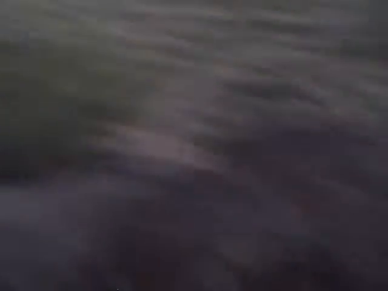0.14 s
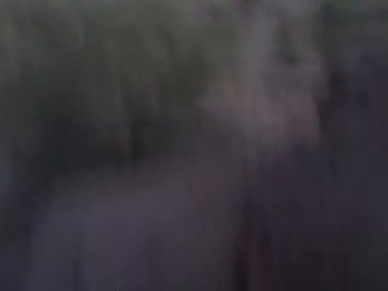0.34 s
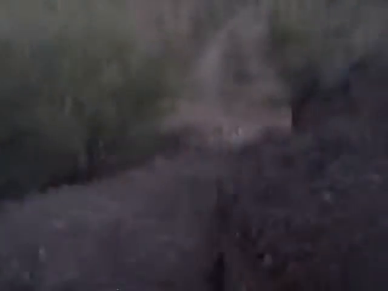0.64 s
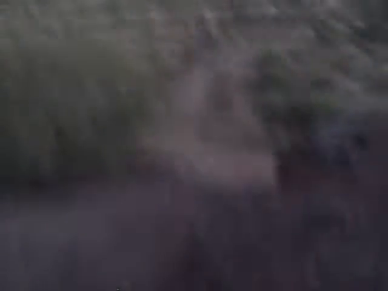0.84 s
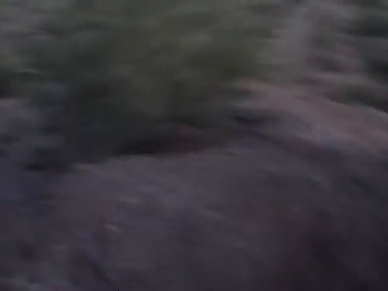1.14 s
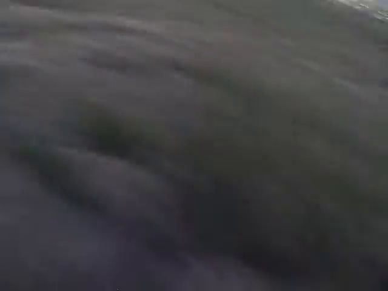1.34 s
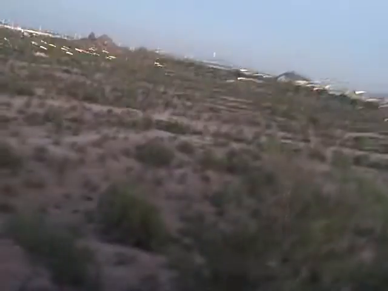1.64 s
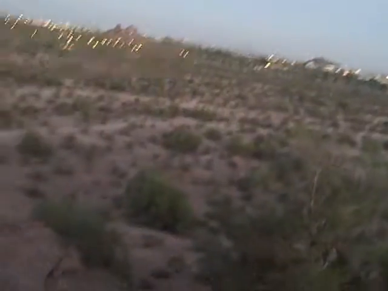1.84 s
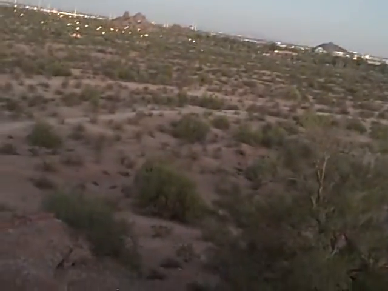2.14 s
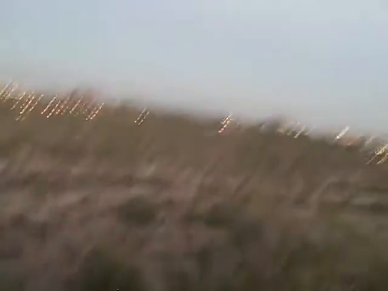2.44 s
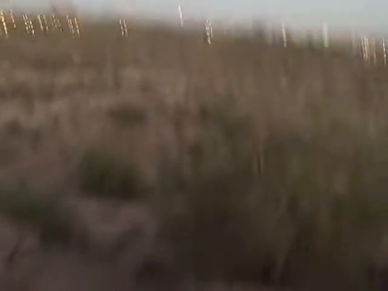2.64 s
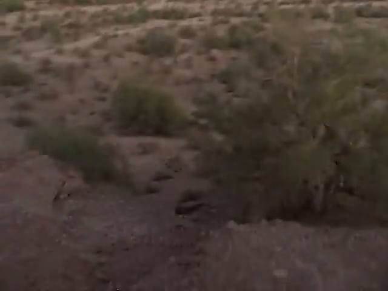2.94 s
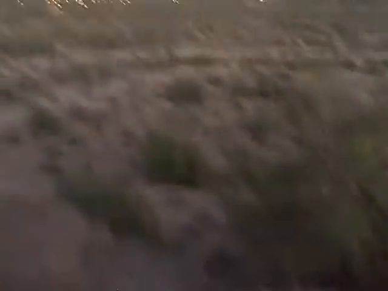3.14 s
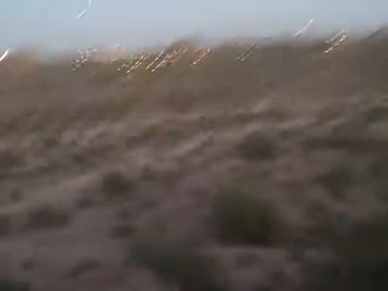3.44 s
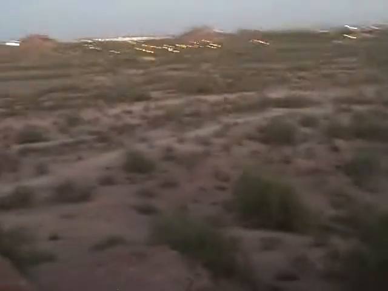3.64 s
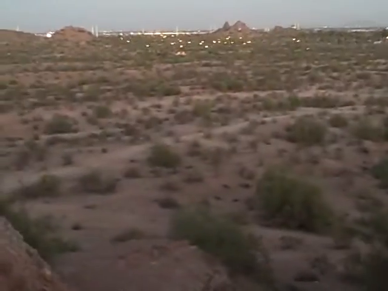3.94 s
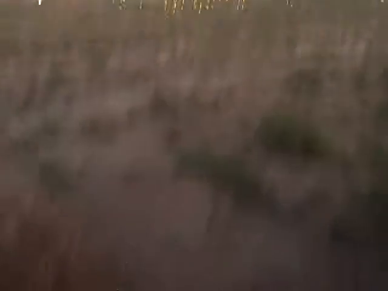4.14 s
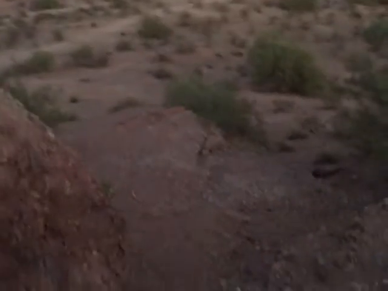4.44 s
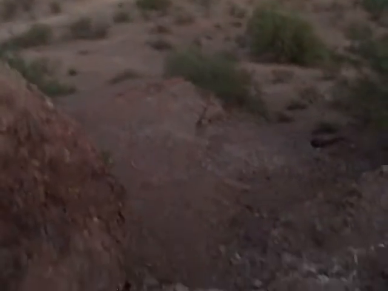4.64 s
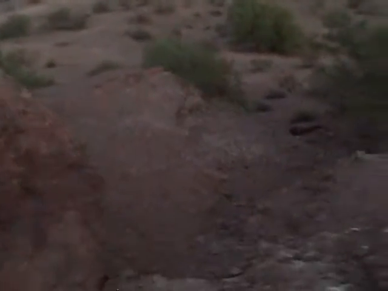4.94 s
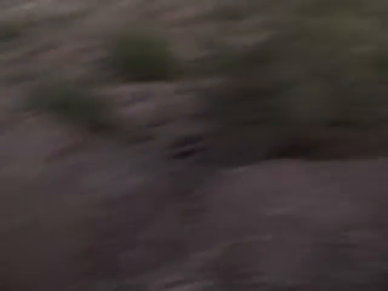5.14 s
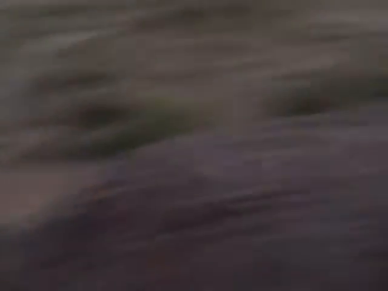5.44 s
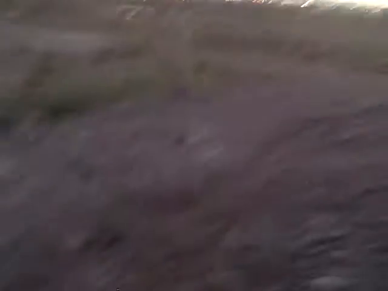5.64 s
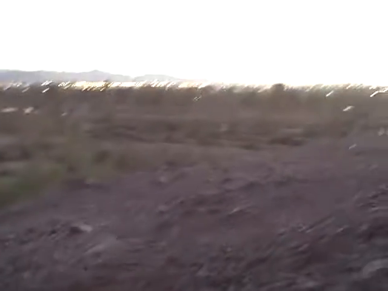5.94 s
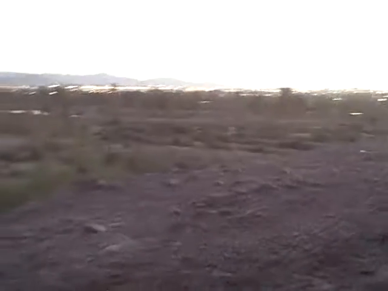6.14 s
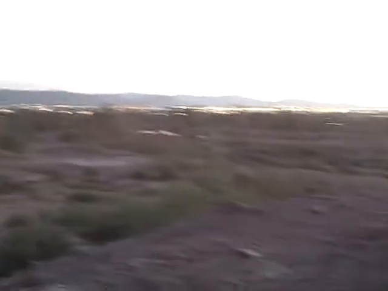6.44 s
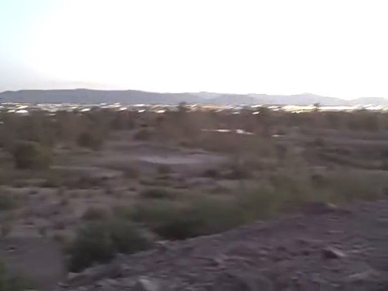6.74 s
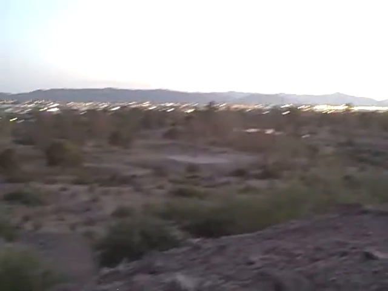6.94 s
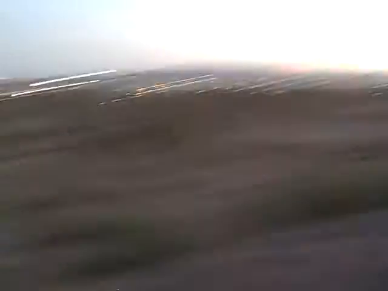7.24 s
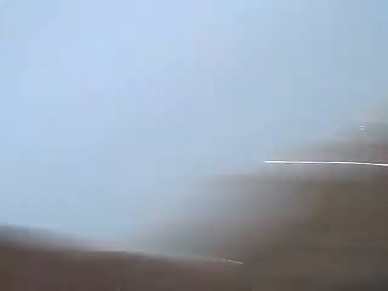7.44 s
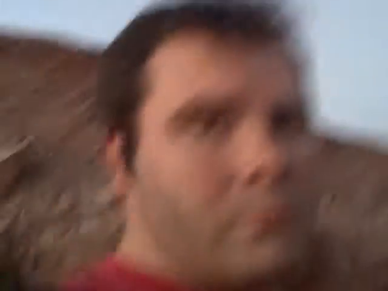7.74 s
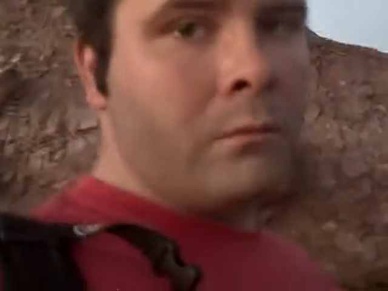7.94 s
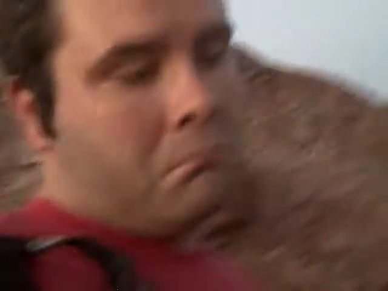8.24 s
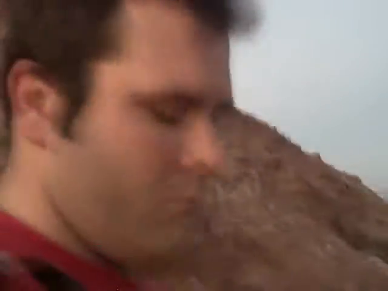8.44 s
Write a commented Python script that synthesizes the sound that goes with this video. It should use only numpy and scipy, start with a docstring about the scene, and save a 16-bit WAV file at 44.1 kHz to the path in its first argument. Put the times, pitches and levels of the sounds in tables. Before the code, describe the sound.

A cicada keeps up a high, finely pulsing buzz in open desert scrub, wavering in level and brightness as a hand-held microphone moves. Boots crunch on gravel at the start, and loose pebbles knock now and then. Near the end come a few more soft steps, the buzz drops in level, and a strap gives a tiny creak. A faint, low hum of distant traffic lies underneath.

```python
"""Cicada in desert scrub

A cicada buzzes by buckling its tymbal, a ribbed drum of skin, about 142 times a second. Each sharp
click echoes off the ground, the bushes and a walker, and the echoes shift as a hand-held camera moves.
A dull hiss pulses in time with the clicks, and a far city hums under a light breeze.
Boots crunch on gravel, pebbles knock, and at last a strap creaks."""
import sys
import numpy as np
from scipy import signal
from scipy.fft import rfft, irfft, next_fast_len
from scipy.io import wavfile
from scipy.ndimage import uniform_filter1d

SR = 44100
rng = np.random.default_rng(int(sys.argv[2]) if len(sys.argv) > 2 else 0)


def transcribe(signal):
    """Save signal, clipped to [-1, 1], as a 16-bit WAV file at the path in sys.argv[1]."""
    frames = np.atleast_2d(signal).T
    limited = np.clip(frames, -1, 1)
    pcm = np.round(limited * 32767).astype(np.int16)
    wavfile.write(sys.argv[1], SR, pcm)


N = 378676

# how loud and bright the cicada is: (time [s], level [dB], treble tilt [dB per octave])
SONG = [(0.0, -28.5, 9), (0.45, -30, 4.5), (1.32, -27.5, 3), (1.55, -29, 4.5), (3.01, -28.5, 2.5),
        (3.39, -31.5, 0), (4.68, -29.5, 1), (5.02, -31, -3), (5.33, -28.5, 1.5), (6.12, -33.5, 2.5),
        (7.44, -30, 5.5), (7.65, -39.5, 1), (8.13, -37, 1.5), (8.35, -38, -0.5), (8.59, -36, 4)]
# the sound's trip gets shorter as the walker comes near: (time [s], travel time [ms])
TRAVEL_TIME = [(0.0, 7), (0.3, 7.3), (0.9, 4.24), (1.7, 2.4), (2.4, 2.3), (3.9, 2.92), (4.8, 2.94),
               (5.4, 2.34), (6.0, 3.7), (6.3, 2.86), (7.2, 2.98), (7.9, 2.74), (8.6, 3.26)]
# the tone of the tymbal: (frequency [Hz], level [dB])
TYMBAL_TONE = [(5200, -51), (6000, -33), (6330, -9.5), (7000, -11.5), (8080, -8), (9240, -2.5), (9760, 2),
               (10400, -2.5), (11300, -5), (12200, -3), (13000, -7), (14300, -15.5), (15000, -17.5),
               (16000, -17)]
# weaker clicks as the tymbal springs back: (delay [ms], level [dB])
SPRING_BACK = [(1.42, -1), (2.118, -3)]
# the ground echo moves as the camera is raised and lowered: (time [s], delay [ms], level [dB])
GROUND_ECHO = [(0, 2.9, -20.), (1.3, 3.3, -16.), (1.9, 3.0, -10.), (2.75, 3.0, -10.), (3.4, 3.6, -13.),
               (3.85, 2.95, -12.), (4.5, 2.83, -9.), (5.05, 2.78, -10.), (5.35, 3.2, -17.),
               (5.8, 3.35, -18.), (7.4, 3.4, -15.), (8.6, 3.25, -18.)]
# how much the echoes outweigh the direct click at each pitch: (frequency [Hz], level [dB])
SCRUB_TONE = [(6000, 9), (8000, 2), (9000, -1.5), (9800, -1), (10700, -1), (12200, 5.5), (15500, 11.5)]
# echo off the walker's body, strongest once the camera faces it: (time [s], delay [ms], level [dB])
BODY_ECHO = [(0, .74, -12), (.6, .75, -13), (1.4, .84, -13), (3.0, .84, -12), (3.4, 1., -20),
             (5.2, .85, -19), (6.0, .92, -14), (7.5, 1.03, -18), (7.8, 1.03, -12), (8.1, .98, -5),
             (8.6, 1.02, -9)]
# a dull hiss that pulses in time with the clicks: (frequency [Hz], level [dB])
HISS_TONE = [(300, -2.5), (700, -1), (1500, -2), (3000, -1.5), (5000, -1.5), (6500, -1), (9000, -45)]
# the far traffic: (frequency [Hz], level [dB])
HUM_TONE = [(8.8, -29), (15, 1), (60, 2), (179, -4), (353, -13), (871, -22), (5030, -30), (6000, -22),
            (7800, -13), (13200, -120)]
# gravel giving way under a boot: (time [s], level [dB], length [s], main frequency [Hz])
CRUNCHES = [(0.083, -38.5, 0.055, 600.), (0.126, -32, 0.043, 1200.), (0.171, -37.5, 0.046, 1350.),
            (0.21, -35, 0.031, 900.), (.30, -48, 0.048, 1000.), (.455, -49, 0.037, 1200.),
            (0.533, -45, 0.032, 500.), (0.562, -40.5, 0.042, 910), (0.601, -47.5, 0.042, 800.),
            (0.634, -42.5, 0.044, 2300.), (1.088, -47.5, 0.091, 700.), (7.4, -52.5, 0.12, 800.),
            (7.678, -53.5, 0.041, 795), (8.419, -50, 0.045, 1200.)]
# pebbles knocking, except the last row, which is the first tick of the strap's creak:
# (time [s], peak level [dB], pitch [Hz], ring time [s])
KNOCKS = [(.357, -27.5, 1250, 0.0074), (.412, -37, 840, 0.016), (.573, -31, 900, .014),
          (0.862, -28, 1010, .02), (0.869, -32, 1140, 0.025), (.973, -39., 960, .014),
          (1.054, -18.5, 1010, 0.012), (1.373, -29, 430, .012), (1.466, -31, 660, .014),
          (3.172, -35, 750, .01), (3.534, -29, 775, .011), (5.332, -24.5, 970, 0.017),
          (5.339, -28.5, 1200, 0.0087), (7.428, -32, 600, 0.013), (7.469, -33, 980, .012),
          (7.493, -24.5, 1050, 0.016), (7.566, -35., 600, 0.014), (7.798, -41, 2000, .006),
          (8.434, -36, 500, .012), (8.445, -39, 800, .012), (8.511, -40, 1300, .012)]
# a knock's notes: (frequency [times the pitch], level [dB], length [share of the ring time])
KNOCK_NOTES = [(.55, -13, 0.51), (1., 2.5, 0.74), (1.3, -2, 0.63), (1.9, 1, 0.37), (2.6, -11, 0.38)]
# the strap's notes: (frequency [Hz], level [dB], ring time [s])
STRAP_NOTES = [(815, -2.5, 0.02), (1370, -2, .01), (1530, 0, 0.016), (1856, 0, .009), (2420, -2, .009),
               (3150, -4.5, .008)]


def gain_of(db):
    """Turns decibels into a number to multiply by."""
    return 10 ** (np.asarray(db) / 20)


def evened(x):
    """Scales a sound to an average (rms) level of 1."""
    return x / np.sqrt(np.mean(x ** 2) + 1e-20)


def tone_db(tone, hz):
    """Looks up a tone table's level at the frequencies hz."""
    freqs, db = np.transpose(tone)
    return np.interp(np.log(hz + 1), np.log(freqs + 1), db)


def coloured(x, tone):
    """Filters a sound by a tone table."""
    size = next_fast_len(len(x))
    gains = gain_of(tone_db(tone, np.fft.rfftfreq(size, 1 / SR)))
    return irfft(rfft(x, size) * gains, size)[:len(x)]


def add(mix, s, sound):
    """Mixes a sound in at s seconds."""
    part = mix[round(s * SR):][:len(sound)]
    part += sound[:len(part)]


def delay(hz, ms):
    """Multiply a spectrum by this to make its sound come later."""
    return np.exp(-2j * np.pi * hz * ms / 1000)


def ring(notes, rise_s=0.00025):
    """A struck object: each note falls 60 dB in its ring time. The peak is 1."""
    t = np.arange(2048) / SR
    x = sum(gain_of(db - 60 * t / ring_s) * np.sin(2 * np.pi * hz * t) for hz, db, ring_s in notes)
    x = x * (1 - np.exp(-t / rise_s))
    return x / abs(x).max()


def buckle(hz, draw, rib_gain=.38, slide_ms=.06):
    """Spectra of clicks of equal energy: three ribs give way in turn, and the pitch slides down."""
    gap_ms = .12 * (0.58 + 0.92 * draw[0])
    ribs = 1 + sum(rib_gain ** k * np.exp(2j * np.pi * draw[k]) * delay(hz, k * gap_ms) for k in (1, 2))
    ribs = ribs * np.exp(1j * np.pi * slide_ms * (hz - 10000) ** 2 / 820000)  # low notes come later
    power = gain_of(tone_db(TYMBAL_TONE, hz)) ** 2
    return ribs / np.sqrt((abs(ribs) ** 2 * power).sum(1, keepdims=True) / power.sum())


def moving_echo(table, s, hz):
    """One echo whose delay and level change over time."""
    times, ms, db = np.transpose(table)
    return gain_of(np.interp(s, times, db)) * delay(hz, np.interp(s, times, ms))


def scrub_echoes(s, hz, ring_s=0.19, bush_db=-12.5, fade_db=4., bush_ms=1.195, bushes=13):
    """Echoes off the ground and bushes; their paths stretch together as the camera moves."""
    stretch = np.interp(s, *np.transpose(GROUND_ECHO)[:2]) / 3.1 - 1
    travel_ms = np.interp(s, *np.transpose(TRAVEL_TIME))
    out = moving_echo(GROUND_ECHO, s, hz)
    for k, (place, sway, walk, phase, rate) in enumerate(rng.random((bushes, 5))):
        ms = 0.463 + 13 * ((k + place) / bushes) ** 1.5
        slide_ms = 0.284 * (.5 + sway) * ms * stretch + 0.103 * (2 * walk - 1) * (travel_ms - 3)
        waver = np.sin(2 * np.pi * (phase + (0.094 + 0.402 * rate) * s))
        level_db = bush_db - 60 * ms / 1000 / ring_s + fade_db * waver
        twigs = rng.random((6, 2))  # each bush is a cluster of small reflectors
        bush = (np.sign(twigs[:, :1] - .5) * delay(hz, bush_ms * twigs[:, 1:])).sum(0) / np.sqrt(6)
        out = out + gain_of(level_db) * bush * delay(hz, ms + slide_ms)
    return out


def cicada(clicks_per_s=142.2, jitter_ms=0.0897, loose_ms=0.028, turn_s=7.5, shadow_db=4.5):
    """The tymbal buckles, springs back and echoes. Each click is built as one row of frequencies."""
    s = np.arange(int(N / SR * clicks_per_s))[:, None] / clicks_per_s
    hz = np.fft.rfftfreq(1024, 1 / SR)[110:380]  # about 5 to 16 kHz
    draw = rng.random((len(s), 8)).T[..., None]
    chance = rng.standard_normal((len(s), 4)).T[..., None]
    s = s + (np.interp(s, *np.transpose(TRAVEL_TIME)) + 0.228 + jitter_ms * chance[0]) / 1000
    times, level_db, tilt_db = np.transpose(SONG)

    click = buckle(hz, draw[:3])
    back = sum(gain_of(db) * delay(hz, ms + loose_ms * c) for (ms, db), c in zip(SPRING_BACK, chance[1:3]))
    back = back * buckle(hz, draw[3:6]) * np.exp(2j * np.pi * draw[3])
    aim = gain_of(0.5 * np.log(draw[6] + 1e-3))  # some clicks half miss the microphone
    direct = aim * click / gain_of(tone_db(SCRUB_TONE, hz))
    tail = back + (click + back) * scrub_echoes(s, hz)
    tail = tail / np.sqrt(uniform_filter1d((abs(tail) ** 2).mean(1, keepdims=True), 40, 0))

    # the echoes gain as the song drops, and take over when the camera turns its back on the insect
    turned = np.clip((s - turn_s) / 0.12, 0, 1)
    tail_gain = gain_of(-3.5 - 0.23 * (np.interp(s, times, level_db) + 29.5) + shadow_db * turned)
    heard = (direct + tail_gain * tail) * (1 + moving_echo(BODY_ECHO, s, hz))
    body_gain = gain_of(np.interp(s, *np.transpose(BODY_ECHO)[[0, 2]]))
    heard /= np.sqrt((1 + body_gain ** 2) * (1 + tail_gain ** 2))  # offsets the power echoes add
    heard *= gain_of(-0.48 * chance[3] ** 2)  # now and then a feeble click
    heard *= gain_of(tone_db(TYMBAL_TONE, hz) + np.interp(s, times, tilt_db) * np.log2(hz / 10000))

    lead = 128  # samples of room before each click
    heard *= np.exp(2j * np.pi * draw[7]) * delay(hz, 1000 * (lead + s * SR % 1) / SR)
    waves = irfft(np.pad(heard, ((0, 0), (110, 133))))
    out = np.zeros(N + 2048)
    np.add.at(out, (s * SR).astype(int) + np.arange(1024), waves)
    return evened(out[lead:N + lead])


def pulsing_hiss(clicks, under_clicks_db=21.5):
    """A dull hiss that pulses in time with the clicks."""
    loudness = np.sqrt(abs(uniform_filter1d(clicks ** 2, 22)))
    return gain_of(-under_clicks_db) * evened(coloured(loudness * rng.standard_normal(N), HISS_TONE))


def city_hum(hum_db=-50, gust_db=6., gust_s=0.82, drift_db=0.6):
    """Far traffic on the breeze: a gust dies away at the start, then the level only drifts."""
    t = np.arange(N) / SR
    drift = sum(np.sin(2 * np.pi * (hz * t + rng.random())) / np.sqrt(hz) for hz in np.geomspace(.2, 3, 12))
    swell_db = gust_db * np.exp(-t / gust_s) + drift_db * evened(drift)
    return gain_of(hum_db + swell_db) * evened(coloured(rng.standard_normal(N), HUM_TONE))


def gravel_crunch(db, length_s, hz, grains_per_s=3000., spread_db=3.):
    """Gravel gives way under a boot: many tiny ticks of uneven size, strongest around hz."""
    size = round(length_s * SR) + 1
    chance, side, weight = rng.random((3, SR // 8))[:, :size]
    ticks = (chance < grains_per_s / SR) * np.sign(side - .5)
    grains = ticks * gain_of(-spread_db * np.log(weight + 0.0092))
    body = [(60, -20), (hz / 3.5, -4), (hz, 0), (hz * 1.6, -3)]
    grit = [(hz * 2.3, -11), (8000, -14), (14000, -21)]
    swell = signal.windows.tukey(size, .35) * gain_of(np.linspace(1.5, -2.5, size))
    return gain_of(db) * evened(coloured(grains, body + grit)) * swell


def knock(db, hz, ring_s):
    """A short ring: a struck pebble, or the first tick of the strap's creak."""
    return gain_of(db) * ring([(k * hz, level, share * ring_s) for k, level, share in KNOCK_NOTES])


def strap_creak(start_s=8.525, slips=8, gap_s=.0067, gap_growth=1.05, slip_db=-37.):
    """The strap sticks and slips, each gap a little longer; every slip makes it ring."""
    k = np.arange(slips)
    gaps = gap_s * gap_growth ** k
    swell_db = 3.5 * np.sin(np.pi * (k + 1) / (slips + 1))
    levels_db = slip_db + swell_db + 1.5 * rng.standard_normal(slips)
    out = np.zeros(N)
    for s, db in zip(start_s + np.cumsum(gaps) - gaps, levels_db):
        add(out, s, gain_of(db) * ring(STRAP_NOTES))
    return out


def scene():
    """Adds all the sounds into one channel."""
    clicks = cicada()
    song_db = np.interp(np.arange(N) / SR, *np.transpose(SONG)[:2])
    mix = gain_of(song_db) * (clicks + pulsing_hiss(clicks)) + city_hum()
    for s, db, length_s, hz in CRUNCHES:
        add(mix, s, gravel_crunch(db, length_s, hz))
    for s, db, hz, ring_s in KNOCKS:
        add(mix, s, knock(db, hz, ring_s))
    return (mix + strap_creak())[None]


def record(dry):
    """The camera cuts off the treble above 15700 Hz."""
    low_pass = signal.firwin(511, 15700, window=("kaiser", 9), fs=SR)
    return signal.oaconvolve(dry, low_pass[None], "same")


dry = scene()
out = record(dry)
transcribe(out)
```